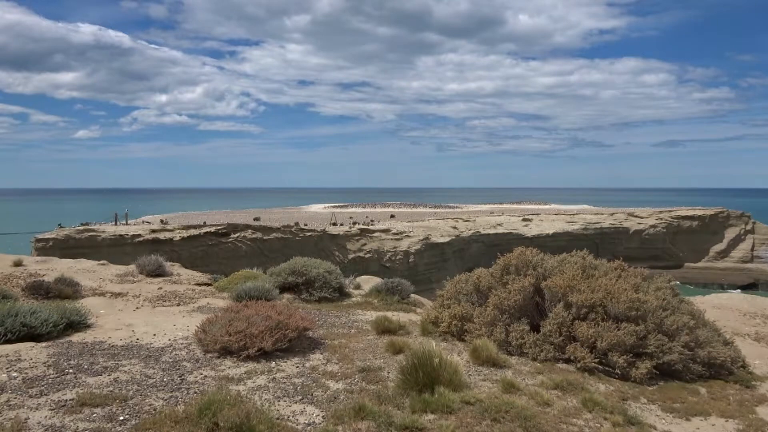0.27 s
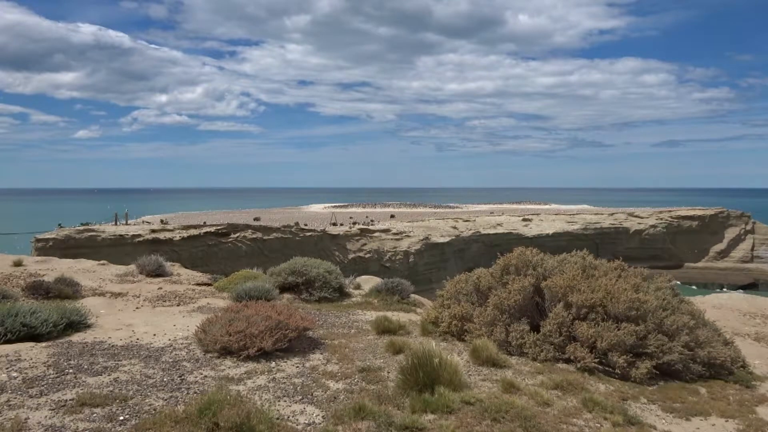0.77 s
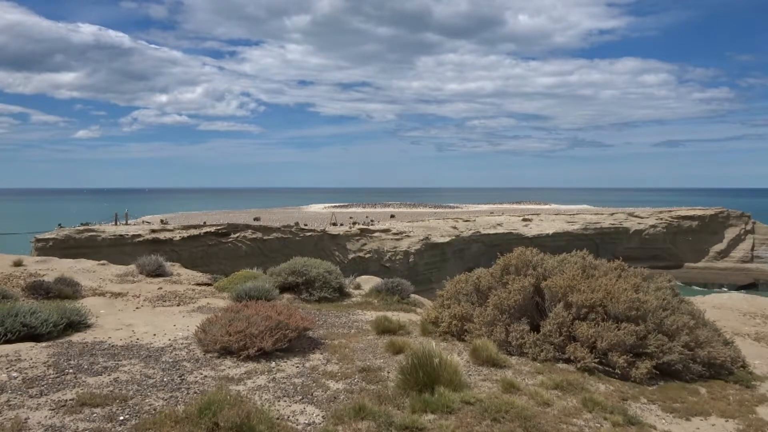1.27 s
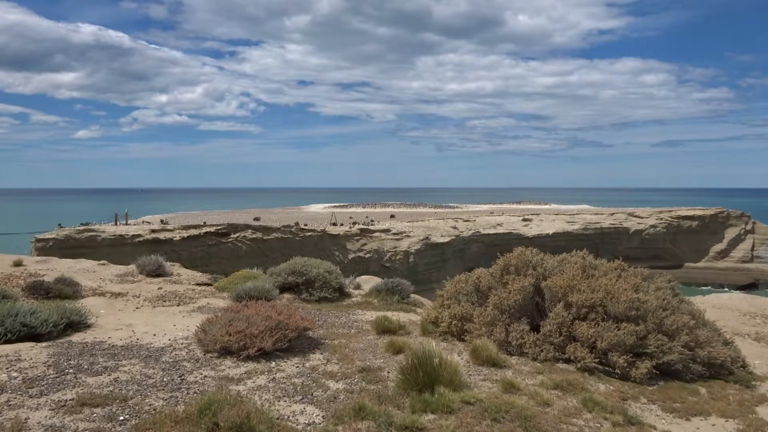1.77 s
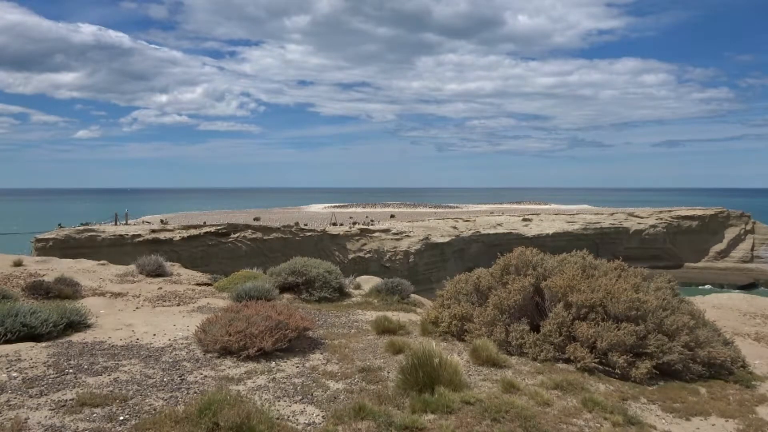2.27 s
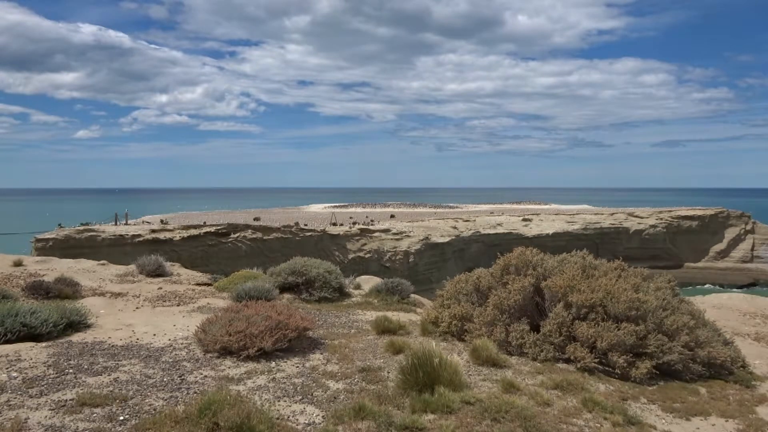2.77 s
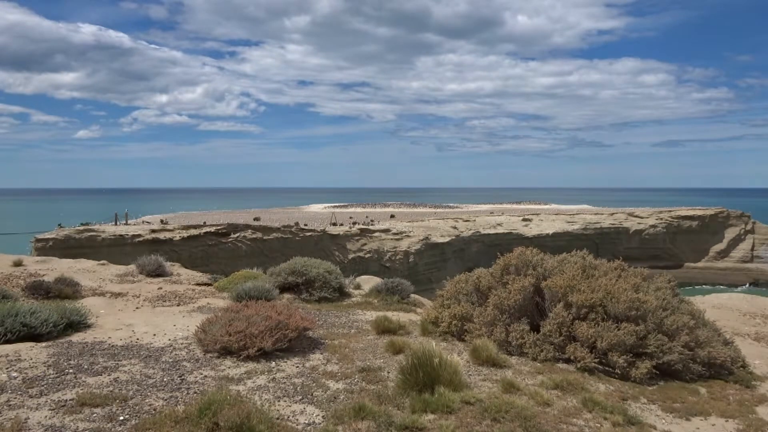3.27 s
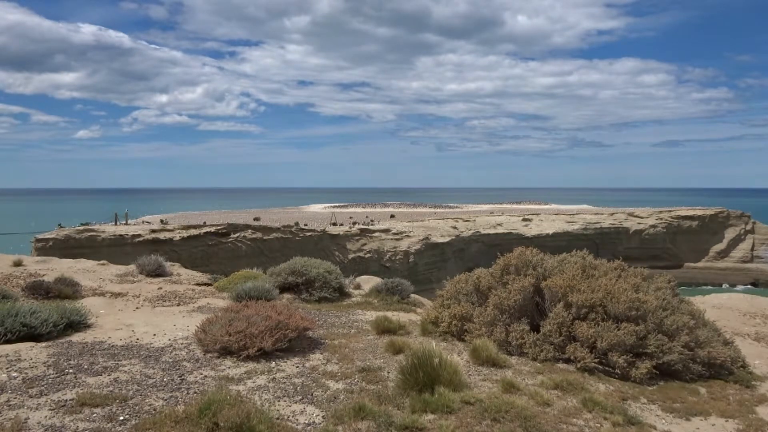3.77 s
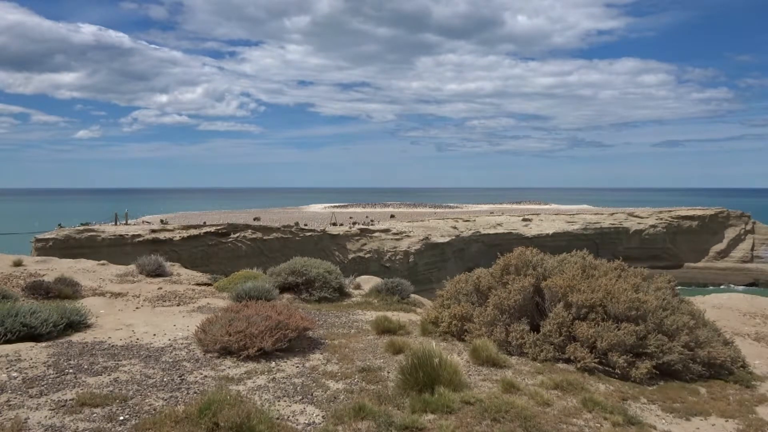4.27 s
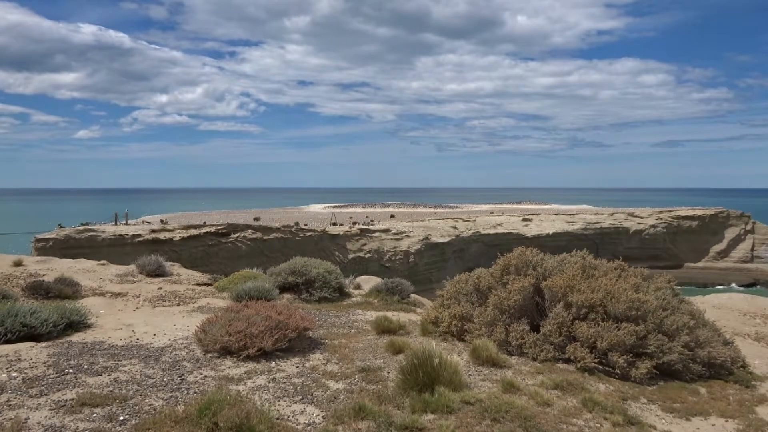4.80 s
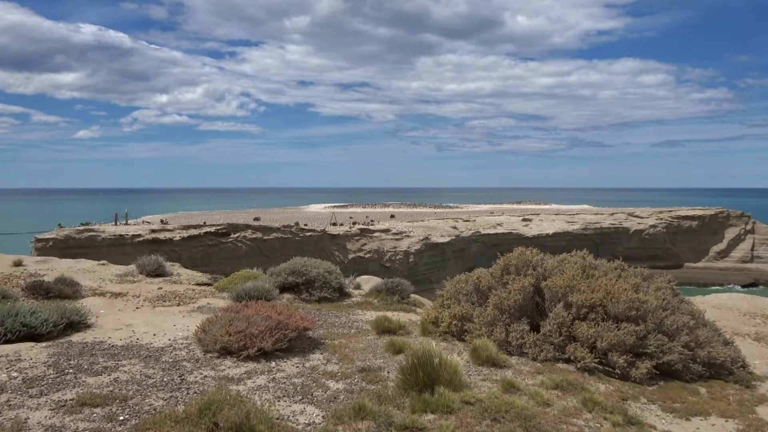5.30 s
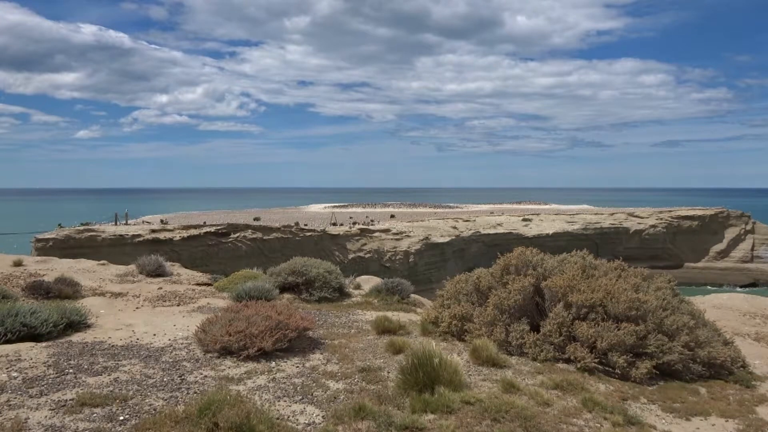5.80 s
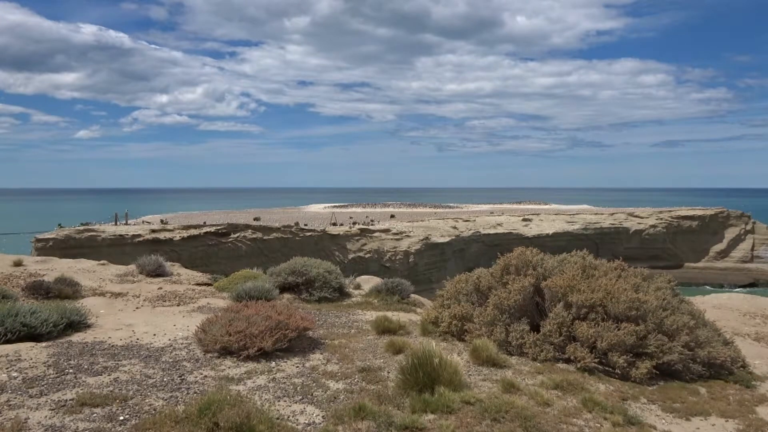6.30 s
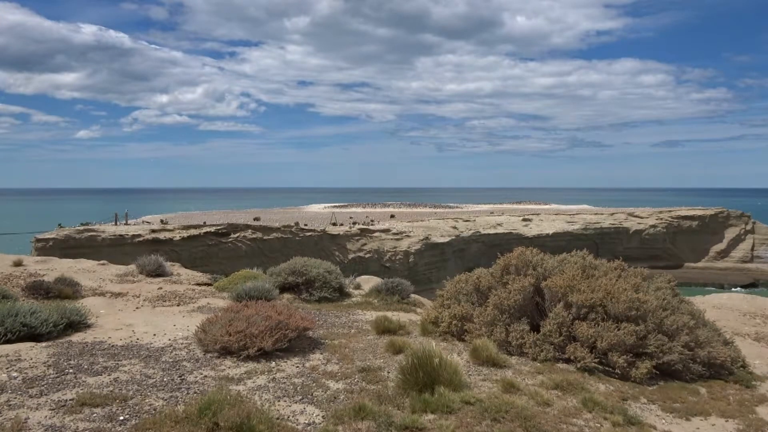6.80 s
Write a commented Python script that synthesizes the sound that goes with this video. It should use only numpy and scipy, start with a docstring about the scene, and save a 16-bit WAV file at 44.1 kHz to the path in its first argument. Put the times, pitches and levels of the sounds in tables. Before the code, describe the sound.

A large seabird colony calls continuously from a coastal rock shelf, its harsh nasal cries merging into a shrill chattering chorus. Individual screeches and short yelps stand out. Around the middle a gust strikes the microphone with low, lumpy, fluttering thumps, lasting over two seconds and then fading. Distant surf washes faintly beneath, and the birds carry on to the end.

```python
"""A seabird colony on a rock shelf off the coast: hundreds of harsh, arching cries, each a sum of harmonics,
merge into a chorus over a blur of noise; nearer birds stand out and echo weakly from the rock.
Halfway through, a gust buffets the microphone ports: low noise in lumps, fluttering, with hard pressure swings.
The sea washes faintly as shaped noise over a thin hiss; a small bird chirps and one high tick sounds."""
import sys
import numpy as np
from scipy import signal
from scipy.fft import rfft, irfft, next_fast_len
from scipy.io import wavfile
from scipy.ndimage import uniform_filter1d, map_coordinates

SR = 44100
rng = np.random.default_rng(int(sys.argv[2]) if len(sys.argv) > 2 else 0)


def pcm_store(signal):
    """Save signal as 16-bit PCM."""
    levels = np.round(np.clip(np.atleast_2d(signal), -1, 1) * 32767)
    wavfile.write(sys.argv[1], SR, levels.astype(np.int16).T)


N = 310905

# Excitement of the colony. Each row: time in seconds, chorus strength in dB before scaling.
CHORUS_STRENGTH = [(0.0, -49), (0.04, -45.5), (1.0, -44.5), (1.31, -46), (1.39, -42.5), (1.61, -52),
                   (1.9, -42.5), (1.94, -47), (2.32, -42.5), (3.1, -50), (3.22, -43), (3.43, -48),
                   (3.61, -44), (4.46, -46), (4.73, -41.5), (4.91, -45.5), (5.1, -42.5), (5.18, -50),
                   (5.32, -41), (5.73, -39), (5.81, -41.5), (6.24, -42), (6.99, -44), (7.05, -44)]
# Vocal tract resonances of the distant birds. Each row: frequency in Hz, gain in dB.
FAR_THROAT = [(600, -4), (1000, -1), (1350, -13.5), (2000, 3), (2650, 0), (3250, -2), (4200, 4), (4900, -2),
              (5600, -4), (6600, -25), (9000, -43)]
# Spectrum of the farthest birds, merged to noise. Each row: frequency in Hz, relative density in dB per Hz.
BLUR_SPECTRUM = [(1000, -37), (1700, -17.5), (2100, -7), (2650, -2.5), (3300, -4), (4100, 0), (4800, -24),
                 (5400, -5), (6600, -51.5), (9500, -84)]
# Vocal tract resonances of the near birds. Each row: frequency in Hz, gain in dB.
NEAR_THROAT = [(1000, -6), (1250, -12), (1500, -16), (2200, 7.5), (3000, 3.5), (3700, 6), (4500, 1.5),
               (5200, -3.5), (6200, -17), (7500, -34), (9500, -46)]
# Harsh cries from the shelf. Each row: start in seconds, length in seconds, pitch in Hz,
# fall as a share of the pitch, level in dB before panning, brightness in dB per harmonic.
SCREECHES = [(.32, 0.12, 1300, 0.22, -48.5, -10), (.52, 0.24, 1242, .02, -50.5, -3.5),
             (0.759, 0.14, 1400, .13, -49, -3), (0.891, 0.098, 1348, 0, -48, -1),
             (1.148, .1, 1443, 0, -54, -10), (1.36, 0.096, 1376, 0.097, -56, -3),
             (1.78, 0.13, 1240, 0.0077, -51.5, -1.5), (2.19, 0.15, 1432, 0.03, -51, 0.5),
             (2.31, .13, 1305, 0.081, -49, -2), (2.718, 0.14, 1268, .1, -53.5, -3),
             (3.13, 0.11, 1415, 0.065, -48.5, -4), (3.213, 0.2, 1344, 0.11, -49.5, -7.5),
             (4.2, 0.21, 1407, 0.078, -55.5, 5), (4.714, .13, 1206, 0.13, -49, -1.5),
             (5.551, 0.19, 1343, .11, -46, -4), (6.57, 0.16, 1380, 0, -53, -1),
             (6.661, 0.11, 1330, 0.053, -48, -15)]
# Short, clear cries of the nearest birds. Each row: start in seconds, length in seconds, top pitch in Hz,
# level in dB before panning, brightness in dB per harmonic.
YELPS = [(3.796, 0.033, 1450, -44, -2), (3.895, 0.026, 1510, -51.5, 2), (4.058, .035, 1500, -43.5, 1.5),
         (4.51, 0.022, 1570, -47, 0), (4.717, 0.064, 1510, -44, 2), (5.079, 0.045, 1556, -43.5, -1.5),
         (5.305, 0.049, 1495, -43.5, 1), (5.485, .045, 1470, -45, 0), (6.01, 0.047, 1490, -53, 3),
         (6.093, 0.068, 1510, -49, -1), (6.177, 0.056, 1417, -45.5, 0), (6.7, 0.055, 1420, -53, -2),
         (6.755, .04, 1560, -58, 0), (6.815, .04, 1590, -56, -1), (6.99, 0.054, 1497, -49, 3.5)]
# Pulsed cries. Each row: start in seconds, length in seconds, pitch in Hz, fall as a share of the pitch,
# level in dB before panning, brightness in dB per harmonic, roughness from 0 to 1.
TRILLS = [(2.49, .21, 1492, .07, -52.5, 3.5, .45), (3.53, 0.22, 1502, 0.042, -51, -6.5, .6),
          (4.537, .175, 1519, .07, -45.5, 0, .2), (4.985, 0.094, 1460, 0.082, -46, 1, 0.23),
          (5.69, .21, 1574, 0, -49.5, 1, .45)]
# Lower, falling cries. Each row: start in seconds, length in seconds, pitch in Hz, level in dB before panning.
WAILS = [(1.52, 0.098, 1183, -53.5), (1.577, 0.16, 1148, -55), (4.597, 0.073, 1110, -54),
         (5.324, .1, 1167, -50.5), (6.466, 0.12, 1237, -53), (6.861, .1, 1283, -51)]
# Rise and fall of the wind under the puffs. Each row: time in seconds, buffeting in dB before random wobble.
WIND_FLOW = [(0, -97), (.75, -70.5), (1.3, -90), (1.7, -63), (2.1, -82), (2.55, -68), (2.8, -52),
             (3.3, -68), (3.37, -64), (3.42, -43.5), (4.02, -42), (4.27, -37), (4.38, -38.5), (4.8, -35.5),
             (5.28, -40.5), (5.38, -49.5), (5.62, -25.5), (5.85, -43), (6.1, -59), (6.3, -52.5),
             (7.05, -57)]
# Separate puffs on the ports. Each row: middle in seconds, length in seconds before stretching,
# level in dB before the common puff gain.
PUFFS = [(1.537, 0.038, -51), (1.683, 0.035, -52), (1.794, 0.03, -57), (2.285, 0.03, -52.5),
         (2.48, 0.035, -49.5), (2.63, 0.03, -49.5), (2.777, 0.07, -43), (2.963, 0.022, -40),
         (3.053, 0.041, -43), (3.42, 0.028, -30.5), (3.488, 0.041, -23), (3.547, 0.048, -25),
         (3.617, 0.0092, -28.5), (3.656, 0.023, -31.5), (3.723, 0.024, -25.5), (3.802, 0.025, -28),
         (3.889, 0.031, -26), (3.954, 0.013, -25), (4.01, 0.031, -36.5), (4.096, 0.023, -22.5),
         (4.143, 0.02, -24.5), (4.214, 0.043, -26.5), (4.413, 0.025, -27), (4.482, 0.025, -21),
         (4.535, 0.025, -23), (4.697, 0.016, -27.5), (4.753, 0.059, -25), (4.868, 0.027, -21),
         (4.94, 0.024, -26), (5.05, 0.045, -27), (5.114, 0.033, -28.5), (5.206, 0.046, -26),
         (5.3, 0.025, -26), (5.509, 0.011, -26), (5.613, 0.021, -20.5), (5.728, 0.031, -30),
         (5.874, 0.023, -28), (5.995, 0.011, -35), (6.185, 0.039, -41), (6.273, 0.048, -48),
         (6.418, 0.027, -45), (6.576, 0.019, -40.5)]
# Spectrum of the large lumps of wind. Each row: frequency in Hz, relative density in dB per Hz.
RUMBLE_SPECTRUM = [(20, -32), (50, -14), (100, -3), (160, 0.5), (240, -1.5), (400, -15), (700, -45),
                   (1500, -86)]
# Spectrum of the small fast eddies. Each row: frequency in Hz, relative density in dB per Hz.
FLUTTER_SPECTRUM = [(100, -23), (220, 1.5), (350, 4.5), (480, -1.5), (700, -11.5), (1000, -25.5),
                    (1600, -32.5), (3000, -91)]
# Coherence of the wind between the ports. Each row: frequency in Hz, left-right likeness from -1 to 1.
PORT_LIKENESS = [(50, 0.47), (130, 0.69), (290, -0.037), (640, -0.47), (1400, 0.043)]
# Hard eddies. Each row: nominal time in seconds, strength in dB before the eddy gain and lean.
EDDIES = [(3.416, -19.5), (3.497, -17), (3.617, -21), (3.871, -17.5), (3.914, -24), (3.948, -23),
          (4.137, -14.5), (4.18, -13.5), (4.215, -13.5), (4.467, -20), (4.479, -17), (4.489, -11),
          (4.526, -11.5), (4.755, -15), (5.282, -23.5), (5.606, -11), (5.632, -15), (5.991, -25.5)]
# Strength of the surf. Each row: time in seconds, level in dB before the surf gain.
SURF_LEVEL = [(0, -49.5), (2.63, -52.5), (4.75, -51), (5.54, -48), (7.05, -48)]
# Spectrum of the surf. Each row: frequency in Hz, relative density in dB per Hz.
SEA_SPECTRUM = [(20, -42), (45, -32), (100, -29), (200, -14), (400, -3.5), (550, -2), (900, -2),
                (1350, 1.5), (1900, -4), (4000, -8.5), (7000, -33.5)]
# Spectrum of the thin hiss. Each row: frequency in Hz, relative density in dB per Hz.
HISS_SPECTRUM = [(1000, -1), (6500, 5), (10000, -2.5), (13000, -0.5), (16000, -9)]
# Coherence of the colony and the sea. Each row: frequency in Hz, left-right likeness from -1 to 1.
AIR_LIKENESS = [(100, 0.78), (300, 0.86), (700, 0.36), (1400, 0.35), (2600, 0.96), (4500, 0.89),
                (8000, 0.54), (14000, 0.84)]
# A small bird's chirp. Each row: time in seconds, mean pitch in Hz, level in dB.
CHIRP = [(6.615, 8300, -87), (6.626, 8200, -52), (6.638, 9340, -59.5), (6.652, 10200, -80)]

CALM_DB = -43  # chorus strength about which loudness and shrillness vary
SHRILL_DB, SHRILL_GROWTH = -13, 1.85  # shrill band relative to CALM_DB; its dB per dB of excitement
PUFF_DB, PUFF_STRETCH = -1.5, 1.21  # gain of all puffs; their reach over their length
FLUTTER_SWING_DB = 5.7  # largest random swing of the flutter, before levelling
TICK_S, TOP_HZ = 6.317, 15800  # moment of the tick; upper band limit


def amp(db):
    """Level: decibels to amplitude ratio."""
    return 10 ** (np.asarray(db) / 20)


def unit(x):
    """Power normalisation: scale to rms 1."""
    return x / np.sqrt(np.mean(x ** 2) + 1e-20)


def even(x):
    """Running power normalisation: hold a stereo sound near rms 1 but keep its fast flicker."""
    power = uniform_filter1d(np.mean(x ** 2, axis=0), size=SR // 7)
    return x / np.sqrt(np.abs(power) + 1e-20)


def along(points, hz):
    """Interpolation of (Hz, value) points on a logarithmic frequency axis."""
    f, v = np.transpose(points)
    return np.interp(np.log(hz + 1), np.log(f + 1), v)


def curves(rows):
    """Linear interpolation in time: one value per sample for each column after the time."""
    s, *columns = np.transpose(rows)
    return [np.interp(np.arange(N) / SR, s, column) for column in columns]


def wobble(rate, size=N):
    """Band-limited fluctuation: a smooth random curve through `rate` knots a second."""
    knots = rng.standard_normal(int(size * rate / SR) + 4)
    return map_coordinates(knots, [np.arange(size) * rate / SR])


def filtered(x, response):
    """Linear filtering: multiply the spectrum by a response of frequency."""
    m = next_fast_len(N + SR // 4)
    return irfft(rfft(x, m) * response(np.fft.rfftfreq(m, 1 / SR)), m)[..., :N]


def spread(pair, likeness, spectrum=((1, 0), (2, 0))):
    """Partial coherence: two unrelated signals, as mid and side, give left and right of a set likeness."""
    def mid_side_gains(hz):
        turn = np.arccos(np.clip(along(likeness, hz), -1, 1)) / 2
        return amp(along(spectrum, hz)) * [np.cos(turn), np.sin(turn)]

    mid, side = filtered(pair, mid_side_gains)
    return unit(np.array([mid + side, mid - side]))


def patchy_noise(spectrum, likeness, patchy_db):
    """Modulated noise: stereo noise of rms 1 with random gain in patches of time and frequency."""
    z = signal.stft(rng.standard_normal((2, N)), nperseg=512)[2]
    field = uniform_filter1d(rng.standard_normal(z.shape[1:]), size=4, axis=0)
    field = uniform_filter1d(field, size=14, axis=1)
    noise = signal.istft(z * amp(patchy_db * unit(field)), nperseg=512)[1][:, :N]
    return spread(noise, likeness, spectrum)


def add(track, s, sound):
    """Superposition: mix a sound in at s seconds."""
    start = max(int(s * SR), 0)
    part = track[start:start + len(sound)]
    part += sound[:len(part)]


def colony():
    """Superposed sources: chorus and far blur swell together and turn shriller with excitement."""
    strength_db, = curves(CHORUS_STRENGTH)
    excitement_db = strength_db - CALM_DB
    voices = spread(np.array([crowd(count=280), crowd(count=130)]), AIR_LIKENESS)
    mix = voices + amp(-1.5) * patchy_noise(BLUR_SPECTRUM, AIR_LIKENESS, patchy_db=3.5)
    low = filtered(mix, lambda hz: 1 / (1 + (hz / 3450) ** 12))
    shrill = mix - low
    low_db = CALM_DB - 1.45 + 0.91 * excitement_db
    shrill_db = CALM_DB + SHRILL_DB + SHRILL_GROWTH * excitement_db
    return amp(low_db) * even(low) + amp(shrill_db) * even(shrill)


def crowd(count):
    """Incoherent addition of distant birds, each with its own pitch, level and trill; most rise, then sag."""
    out = np.zeros(N + SR)
    for k, (when, long, trill, sag) in enumerate(rng.random((count, 4))):
        pitch, nearness, tempo = rng.standard_normal(3)
        arch = np.array([1 + .16 * (sag - .6), 1, 1 - 0.1294 * sag])
        pitches = 1350 * np.exp(.08 * pitch) * arch
        trill_hz = 32 * np.exp(0.237 * tempo)
        voice = screech(.07 + .18 * long, pitches, FAR_THROAT, 0, trill, trill_hz,
                        jitter=0.012, rasp=0.51, count=4)
        start = (k + 2 * when) / count * (N / SR + .5)
        add(out, start, amp(7.8 * np.tanh(nearness)) * voice)
    return unit(out[SR // 2:][:N])  # begins with birds already calling


def screech(length, pitches, throat, bright_db, trill, trill_hz, jitter, rasp, count=5):
    """Source and filter: throat-shaped harmonics on a pitch arch, trilled and roughened by the unsteady syrinx."""
    n = max(int(length * SR), 256)
    t, u = np.arange(n) / SR, np.linspace(0, 1, n)
    beat = np.abs(np.sin(np.pi * trill_hz * t))
    arch = np.polyval(np.polyfit([0, .5, 1], pitches, 2), u)
    bend = .03 * trill * (beat - 2 / np.pi)  # 2/pi is the mean of the beat
    pitch = arch * (1 + jitter * wobble(352.2, size=n) + bend)
    phase = 2 * np.pi * np.cumsum(pitch) / SR
    voice = sum(amp(along(throat, k * pitch) + bright_db * k) * np.sin(k * phase)
                for k in range(1, count + 1))
    swell = np.sqrt(np.abs(np.sin(np.pi * u)))
    chop = 1 - np.clip(trill, 0, 1) * (1 - beat)
    return unit(voice * swell * chop * (1 + rasp * wobble(500.8, size=n)))


def near_birds():
    """Direct sound: four kinds of cry carry over the chorus."""
    out = np.zeros(N)
    for s, length, pitch, fall, db, bright_db in SCREECHES:
        voice = cry(length, pitch, fall, arch=.025, bright_db=bright_db, trill=.25, rough=.6)
        add(out, s, amp(db) * voice)
    for s, length, pitch, db, bright_db in YELPS:
        voice = cry(length, pitch, fall=.015, arch=.055, bright_db=bright_db, trill=.1, rough=.2)
        add(out, s, amp(db) * voice)
    for s, length, pitch, fall, db, bright_db, rough in TRILLS:
        arch = .12 * rough - .02
        voice = cry(length, pitch, fall, arch, bright_db=bright_db, trill=.85, rough=rough)
        add(out, s, amp(db) * voice)
    for s, length, pitch, db in WAILS:
        voice = cry(length, pitch, fall=.2, arch=.005, bright_db=-16, trill=.2, rough=.4)
        add(out, s, amp(db) * voice)
    return out


def cry(length, pitch, fall, arch, bright_db, trill, rough):
    """Frequency modulation: a near bird's pitch arches and falls; roughness unsettles pitch and strength."""
    pitches = pitch * np.array([1 - arch + fall / 2, 1, 1 - arch - fall / 2])
    return screech(length, pitches, NEAR_THROAT, bright_db, trill, trill_hz=29.5,
                   jitter=.013 * rough, rasp=.7 * rough)


def low_call():
    """Few harmonics: one deep, soft call from far off."""
    out = np.zeros(N)
    throat = [(550, 1), (1100, -20), (2000, -30)]  # Hz, dB
    call = screech(0.266, (510, 565, 565), throat, 0, 0.84, trill_hz=10.8, jitter=0.025, rasp=0.42, count=2)
    add(out, 2.15, amp(-61.5) * call)
    return out


def cliffs(x):
    """Diffuse reflection: the rock faces scatter a short echo to each side, as convolution with decaying noise."""
    t = np.arange(SR // 3) / SR
    tail = rng.standard_normal((2, len(t))) * amp(-60 * t / 0.14)  # 60 dB of decay in 0.14 s
    return signal.fftconvolve(x[None], tail / np.linalg.norm(tail[0]), axes=1)[:, :N]


def wind():
    """Turbulent pressure at the ports comes in lumps; stronger gusts add more small fast eddies on top."""
    buffet_db = buffeting()
    lumps_db = 3 * np.tanh(wobble(70))
    rumble_db = buffet_db - 0.7 * np.maximum(buffet_db + 38.5, 0) + 0.59  # grows less in strong wind
    rumble_noise = patchy_noise(RUMBLE_SPECTRUM, PORT_LIKENESS, patchy_db=2.0)
    rumble = amp(rumble_db) * unit(amp(lumps_db) * rumble_noise)
    flutter_db = buffet_db - 1.24 * np.maximum(-35 - buffet_db, 0) + 0.45  # dies away fast in weak wind
    swing_db = lumps_db + FLUTTER_SWING_DB * np.tanh(wobble(190))
    flutter_noise = patchy_noise(FLUTTER_SPECTRUM, PORT_LIKENESS, patchy_db=1.0)
    flutter = amp(flutter_db) * unit(amp(swing_db) * flutter_noise)
    return rumble + flutter


def buffeting():
    """Addition of powers: wind strength in dB, bell-shaped puffs on top of an unsteady flow."""
    flow_db, = curves(WIND_FLOW)
    t = np.arange(N) / SR
    power = amp(flow_db + 1.6 * np.tanh(wobble(22))) ** 2
    for s, length, db in PUFFS:
        bell = np.exp(-(2 * (t - s) / (PUFF_STRETCH * length)) ** 2)
        power = power + amp(db + PUFF_DB) ** 2 * bell
    return 10 * np.log10(power)


def eddies():
    """Travelling pressure: a hard eddy reaches one port just after the other, hits fast and eases off."""
    out = np.zeros((2, N))
    t = np.arange(-SR // 100, SR // 100) / SR
    for (s, db), (size, lean) in zip(EDDIES, rng.uniform(-1.34, 1, (len(EDDIES), 2))):
        u = t / (.00062 * np.exp(.12 * size))
        u = u - 0.28 * np.logaddexp(u, -u)  # quicker before the middle, slower after
        swing = np.sin(2 * u + np.pi * lean) * np.exp(-u * u / 4)
        for port, side in zip(out, (1, -1)):
            lag = side * 0.00017 * np.sign(lean)  # seconds
            add(port, s + t[0] + 0.00194 + lag, amp(db - 1.5 + side * lean) * swing)
    return out


def sea():
    """Broadband noise: distant surf over a thin, even hiss."""
    surf_db, = curves(SURF_LEVEL)
    surf = amp(surf_db + 2.5) * patchy_noise(SEA_SPECTRUM, AIR_LIKENESS, patchy_db=1.5)
    hiss = amp(-68.0) * patchy_noise(HISS_SPECTRUM, AIR_LIKENESS, patchy_db=3.0)
    return surf + hiss


def small_sounds():
    """Swept tone and noise impulse: a small bird's thin rising chirp and one faint, high tick."""
    hz, db = curves(CHIRP)
    sounding = db > max(db[0], db[-1])  # silent before and after
    phase = 2 * np.pi * np.cumsum(hz * (1 + 0.017 * wobble(950))) / SR
    chirp = amp(db) * sounding * np.sin(phase)
    high_noise = unit(filtered(rng.standard_normal(N), lambda f: 1 / (1 + (9000 / (f + 1)) ** 8)))
    tick_shape = np.exp(-np.abs(np.arange(N) / SR - TICK_S) / .002)
    return chirp + amp(-50) * high_noise * tick_shape


def scene():
    """Level-difference panning: the birds sit a little to the left, amid wind and sea."""
    near = near_birds() + low_call()
    pan = amp([[1.25], [-1.25]])  # dB, left and right
    birds = (colony() + near + amp(-23) * cliffs(near)) * pan
    return birds + sea() + wind() + eddies() + small_sounds()


def record(dry):
    """Band limitation: nothing passes from the upper limit onward."""
    return filtered(dry, lambda hz: hz < TOP_HZ)


dry = scene()
out = record(dry)
pcm_store(out)
```